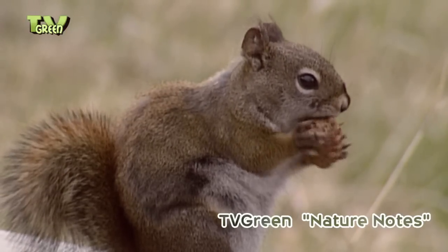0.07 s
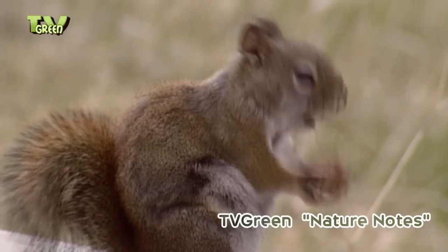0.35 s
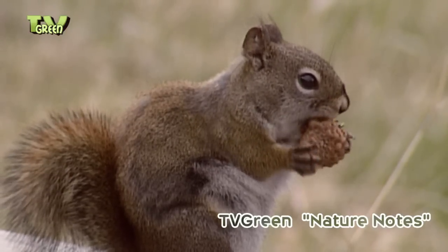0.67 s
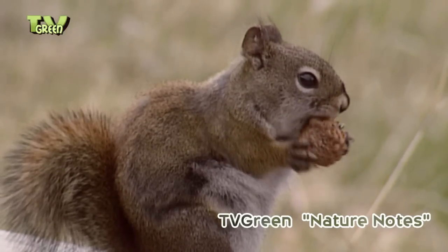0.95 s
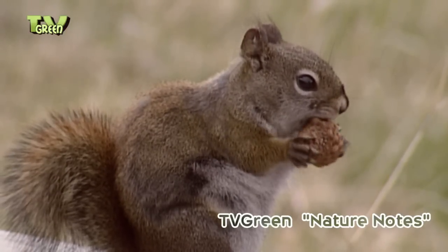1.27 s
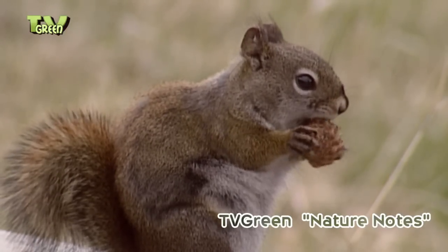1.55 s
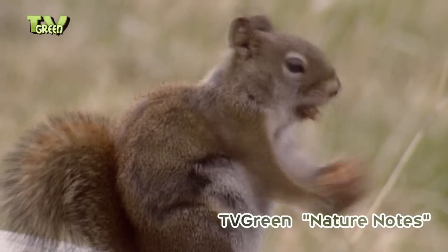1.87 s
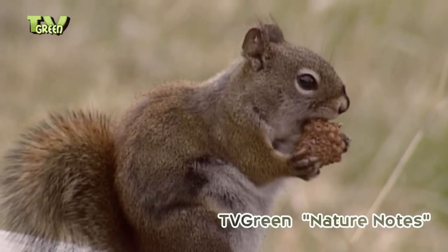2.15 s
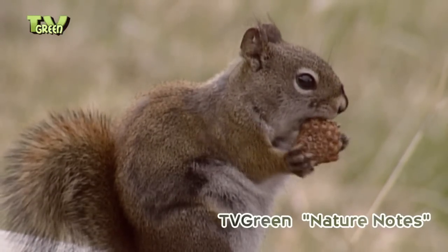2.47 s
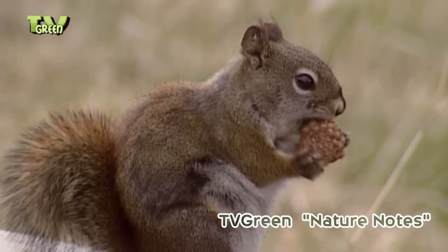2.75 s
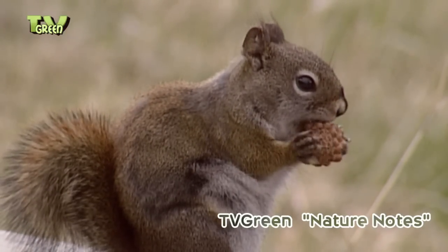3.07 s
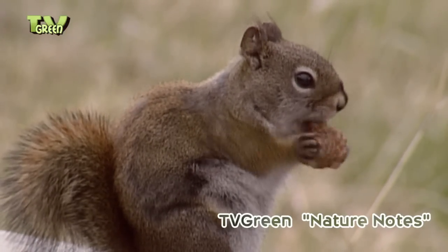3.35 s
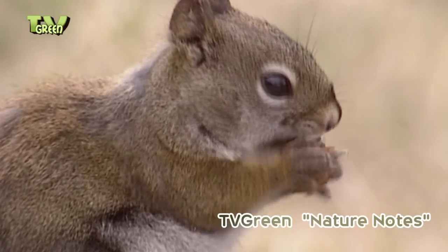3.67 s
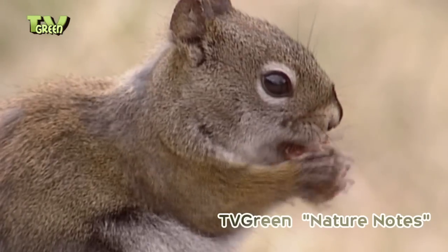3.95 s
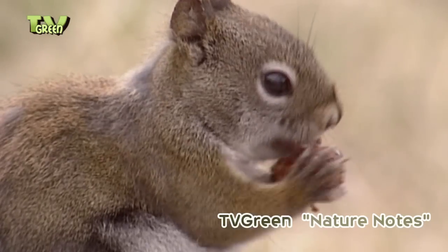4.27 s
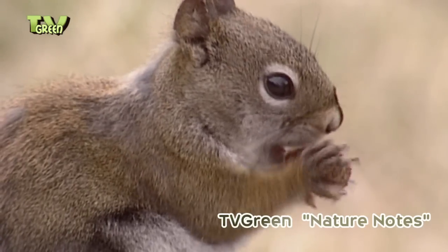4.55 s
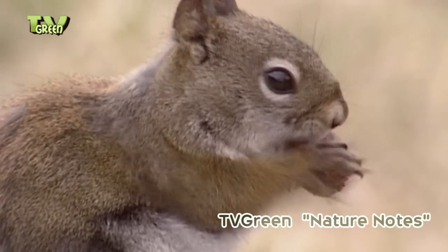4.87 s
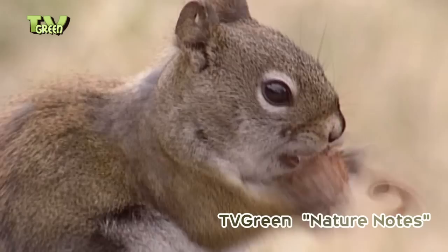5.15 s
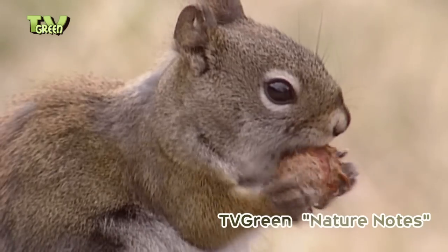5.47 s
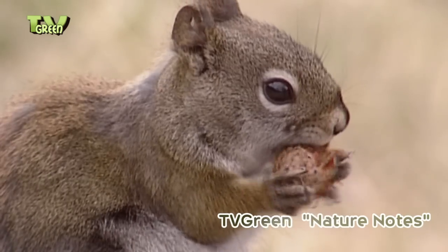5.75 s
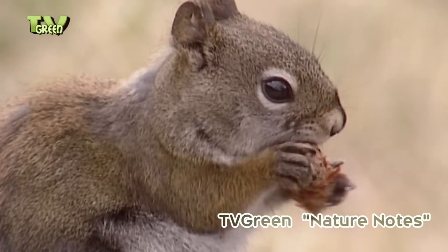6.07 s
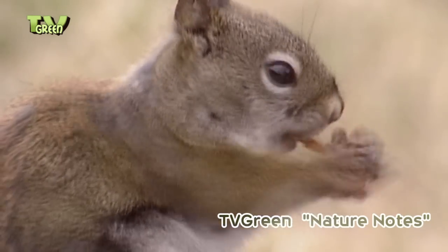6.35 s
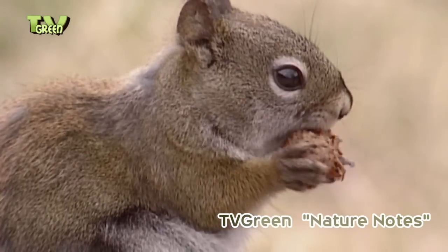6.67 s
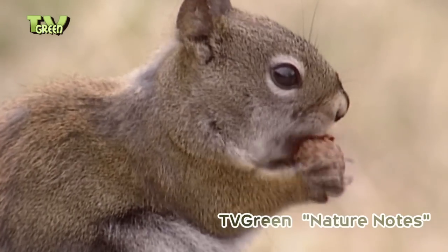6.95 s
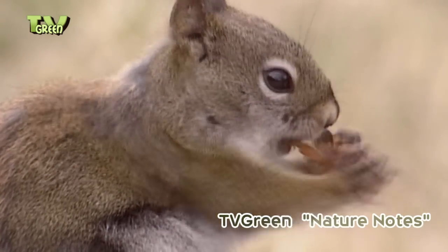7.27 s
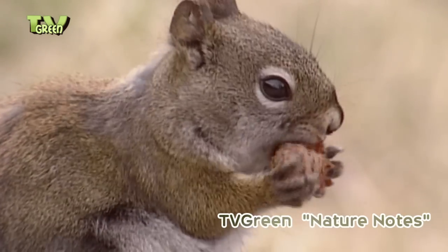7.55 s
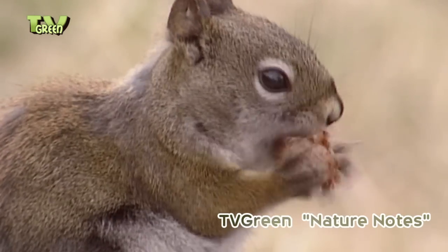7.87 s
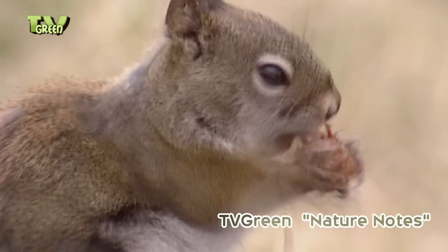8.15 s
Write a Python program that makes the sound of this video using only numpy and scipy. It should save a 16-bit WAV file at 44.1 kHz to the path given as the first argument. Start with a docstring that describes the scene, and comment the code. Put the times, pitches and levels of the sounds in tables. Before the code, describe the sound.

Eight short, squeaky squirrel chirps sound up close, the first two loudest, while birds whistle faintly far off in the woods.

```python
"""Eight sharp chirps from a red squirrel close to the microphone, in a wood. Each is an arched, fluttering
squeak of the vocal folds, closed by a click of the mouth; the trees send back a faint echo.
The squirrel also whimpers once and gnaws and shifts a cone. Far off, birds whistle, twitter, call
and trill. Under it all lie soft hiss, a low drone, rumbling gusts of wind and mains hum."""
import sys
import numpy as np
from scipy import signal
from scipy.fft import rfft, irfft, next_fast_len
from scipy.io import wavfile
from scipy.ndimage import uniform_filter1d, minimum_filter1d, map_coordinates

SR = 44100
rng = np.random.default_rng(int(sys.argv[2]) if len(sys.argv) > 2 else 0)


def transcribe(signal):
    """Save signal, clipped to [-1, 1], as a 16-bit WAV file at the path in sys.argv[1]."""
    frames = np.atleast_2d(signal).T
    limited = np.clip(frames, -1, 1)
    pcm = np.round(limited * 32767).astype(np.int16)
    wavfile.write(sys.argv[1], SR, pcm)


N = 371322

# the squirrel's chirps: start_s, length_s, top_pitch_hz, level_db, roughness, flutter_hz, click_t60_s
CHIRPS = [(0.6259, 0.057, 1895, 3.5, 0.69, 150, .007), (1.4999, 0.053, 1891, 2.5, 0.65, 290, .01),
          (2.345, 0.054, 1700, -8, 0.44, 200, .013), (3.216, 0.05, 1798, -7.5, 0.27, 270, .05),
          (3.907, 0.048, 1697, -10.5, .38, 195, .009), (4.531, .0445, 1719, -9.5, 0.1, 200, .018),
          (5.684, 0.047, 1638, -13, 0.08, 200, .07), (7.3358, 0.047, 1703, -8.5, 0.05, 200, .005)]
# slow drift of the ambience: time_s, hiss_relative_db, chorus_relative_db
AMBIENCE = [(0, -61, -63), (1.8, -63, -65), (2.5, -65.5, -68.5), (3.7, -67, -72.5), (5.8, -67, -71.5),
            (8.42, -65.5, -69.5)]
ONSET_S = .0015  # the vocal folds start up


def squirrel(ceiling=0.89):
    """Close chirps, a soft low blip after each, one rising whimper and the clicks of the mouth."""
    voice = np.zeros(N)
    for start, length, top_hz, db, rough, flutter_hz, _ in CHIRPS:
        call = signal.resample_poly(amp(db) * squeak(length, top_hz, rough, flutter_hz), 2, 1)
        # the hardest calls are overdriven: flattened peaks add harsh overtones
        call = call / (1 + (call / ceiling) ** 6) ** (1 / 6)
        add(voice, start, signal.resample_poly(call, 1, 2))
        blip = slur(0.043, 930, 784, 860, break_db=3.0)
        add(voice, start + .143, amp(-58 + db / 2) * blip * np.tanh(wobble(400, len(blip))))
    whimper = slur(0.038, 2090, 2840, 3100, break_db=-4.5)
    add(voice, 5.735, amp(-47) * whimper)
    # a tiny mouth radiates little bass, and the highest treble is lost
    voice = filtered(voice, lambda hz: hz / np.hypot(hz, 260) / (1 + (hz / 14500) ** 6))
    return voice + amp(4) * mouth_clicks()


def squeak(length, top_hz, rough, flutter_hz, strain_centre=.47, sag=.09, jitter=.05):
    """One arched call: the harmonics of the vocal folds sweep through fixed throat resonances."""
    # throat response: frequency_hz, gain_db
    throat = [(900, -13.5), (1600, -17.5), (1900, -22), (2500, -8.5), (3300, 0.5), (3800, -3), (4400, -4.5),
              (5200, -9), (6100, -4.5), (6900, -0.5), (7500, -4.5), (8400, -24), (10400, -22), (12000, -42),
              (15000, -36.5)]
    # breath noise: frequency_hz, density_db
    rasp = [(100, -22.5), (220, -19.5), (450, -23.5), (900, -15), (1400, -16.5), (2000, -15.5),
            (2500, -21.5), (3400, -1), (5200, -2), (7300, -1.5), (8600, -12.5), (11000, -16.5),
            (16000, -28)]
    size = SR // 8
    t = np.arange(size) / SR
    progress = t / length
    pitch_ratio, effort_db = arch(t, length, rough)
    # under strain a second, slow oscillation chokes the folds and pulls the pitch down
    strain_width = .55 * np.sqrt(rough) * np.where(progress < strain_centre, .5, 1)
    strain = np.exp(-((progress - strain_centre) / strain_width) ** 2)
    flutter_cycles = flutter_hz * (t - strain_centre * length) + 0.039 * wobble(150, size)
    flutter_depth = np.clip(0.94 * rough ** .7 * np.sqrt(strain), 0, .97)
    choke = flutter_depth * np.cos(np.pi * flutter_cycles) ** 4
    effort = amp(effort_db) * (1 - choke) * np.minimum(t / ONSET_S, 1)
    hz = top_hz * pitch_ratio * (1 - sag * choke + jitter * rough * strain * wobble(1500, size))
    phase = 2 * np.pi * np.cumsum(hz) / SR
    k = np.arange(1, 10)[:, None]
    # upper harmonics need more effort than lower ones
    gains = amp(along(throat, k * hz)) * effort ** (0.78 * (k > 3))
    harmonics = np.sum(gains * np.sin(k * phase - np.pi / 6), axis=0)
    # strained folds double their period and hiss
    half_harmonics = np.sum(amp(along(throat, (k - .5) * hz)) * np.cos((k - .5) * phase), axis=0)
    growl = 0.74 * rough ** 1.5 * strain * half_harmonics * wobble(300, size)
    breath = (.55 * rough * strain + .05) * noise(rasp, size)
    return effort * (harmonics + growl + breath) * (progress < 1)


def arch(t, length, rough):
    """Pitch ratio and effort in dB rise, hold, then sink ever faster; strain shortens the attack."""
    attack_s = length * np.clip(.31 - .21 * rough, .05, .5)
    rise_left = np.clip(1 - t / attack_s, 0, 1)
    fall = np.clip((t - attack_s) / (length - attack_s), 0, 1)
    pitch_ratio = 1 - .16 * rise_left ** .75 - 0.37 * fall ** 3
    effort_db = -12 * np.sqrt(rise_left) - 32 * fall ** 4
    return pitch_ratio, effort_db


def mouth_clicks(close_gap_s=.0064):
    """The mouth clicks shut and rings, harder after loud chirps; clean ones also open with a tick."""
    # mouth resonances: centre_hz, width_hz, gain_db
    modes = [(930, 87, -9.5), (1810, 350, -5.5), (2520, 310, -10), (3650, 1100, -1), (5740, 400, 4.5),
             (7340, 1000, -11)]
    clicks = []
    for start, length, _, db, rough, _, t60 in CHIRPS:
        clicks.append((start + ONSET_S / 2, -13 - 54.5 * rough, .004))
        close_db = -15 + 0.32 * db - 10 * np.log10(t60 / .01)  # a longer click spreads the same energy
        clicks.append((start + length + close_gap_s, close_db, t60))

    def cavity(hz):
        return sum((-1) ** k * amp(db) * 1j * hz * width / (centre ** 2 - hz ** 2 + 1j * hz * width)
                   for k, (centre, width, db) in enumerate(modes))
    return filtered(bursts(clicks), cavity)


def cone():
    """Teeth tick on a dry cone, and paws shift it with a soft rustle."""
    # gnawing ticks: start_s, level_db, t60_s
    ticks = [(6.585, -50.5, 0.03), (6.593, -46, 0.015), (8.1545, -33, 0.0086)]
    # paw movements: start_s, length_s, level_db
    rustles = [(1.989, 0.07, -57), (6.54, 0.072, -54)]
    # rustle spectrum: frequency_hz, density_db
    paws = [(60, -8.5), (200, 3.5), (900, -8), (1600, -28), (6000, -40.5)]
    out = filtered(bursts(ticks), lambda hz: 1 / (1 + 1j * hz / 11000))
    for start, length, db in rustles:
        size = round(length * SR)
        add(out, start, amp(db) * np.hanning(size) * noise(paws, SR // 2)[:size])
    return out


def tree_echo(x, delay_s=.1055, trunk_hz=2500):
    """One slightly smeared answer from the trees; thin trunks send back mostly treble."""
    echo = filtered(x, lambda hz: np.exp(-2j * np.pi * hz * delay_s) * hz / np.hypot(hz, trunk_hz))
    return echo + 0.28 * woods(echo, t60=0.024)


def woods(x, t60):
    """Diffuse scatter from ground and trunks."""
    t = np.arange(SR // 2) / SR
    tail = rng.standard_normal(len(t)) * amp(-60 * t / t60) * (1 - np.exp(-t / .008))
    return signal.fftconvolve(x, tail / np.linalg.norm(tail))[:N]


def far_birds():
    """One song, whistles, twitters and nasal calls, far off among the trees."""
    # falling notes: plain whistles, plus the lower tones under the nasal calls near 4.05 s and 6.39 s: start_s,
    # length_s, first_hz, fall_share, level_db
    falling_notes = [(1.819, 0.094, 2490, 0.06, -60), (2.121, .3, 3023, 0.1, -49), (2.463, .09, 1834, 0.12, -55),
                     (4.077, .13, 1950, .18, -60.5), (4.102, .18, 3760, 0.25, -54),
                     (4.347, 0.058, 3006, 0.036, -59.5), (4.569, 0.08, 2400, .05, -48),
                     (4.681, 0.057, 2720, 0.044, -53), (5.26, .11, 2387, 0.063, -56),
                     (6.405, 0.1, 2308, 0.2, -56), (6.679, 0.18, 3940, 0.0095, -62),
                     (6.93, 0.096, 2480, .06, -50.5)]
    # quick twitters: start_s, length_s, first_hz, level_db
    twitters = [(2.679, 0.044, 3214, -59.5), (2.78, 0.093, 4110, -55), (2.875, 0.047, 3000, -59.5),
                (3.032, 0.094, 4266, -57), (4.976, .05, 3200, -61.5), (7.509, 0.039, 4430, -67)]
    # nasal calls: start_s, length_s, top_pitch_hz, level_db, roughness
    nasal_calls = [(0.378, 0.046, 2105, -42, 0.2), (1.143, 0.046, 1876, -54, 0),
                   (4.054, 0.07, 1917, -55, 0.3), (5.158, 0.052, 1880, -59, .1),
                   (6.175, 0.059, 2010, -56, 0.17), (6.394, 0.19, 1430, -56.5, 1.2),
                   (6.729, 0.068, 1955, -51, 0.38), (7.157, 0.061, 2090, -47.5, 0.54)]
    out = songbird()
    for start, length, hz, fall, db in falling_notes:
        add(out, start, amp(db) * whistle(length, hz, fall))
    for start, length, hz, db in twitters:
        add(out, start, amp(db) * twitter(length, hz))
    for when, pitch, steepness in rng.random((5, 3)):  # fainter whistles come by chance
        add(out, 4 + 4 * when, amp(-64) * whistle(0.054, 2000 + 1800 * pitch, 0.28 * steepness))
    for start, length, top_hz, db, rough in nasal_calls:
        call = squeak(length, top_hz, rough, flutter_hz=200)
        overtones = filtered(call, lambda hz: (hz > 2500) / (1 + (hz / 6800) ** 8))
        add(out, start, amp(db) * overtones)
    return out + amp(-9) * woods(out, t60=.14)


def songbird(upsweep_s=.066, trill_start_s=6.704, notes_per_s=27.9, trill_notes=13):
    """Three pairs of a high upsweep and a lower downsweep, then an even trill that fades at its end."""
    # sweep pairs, timed at the turn from up to down: turn_s, level_db
    pairs = [(6.044, -47.5), (6.301, -46), (6.566, -44)]
    out = np.zeros(N)
    for turn, db in pairs:
        add(out, turn - upsweep_s, amp(db) * slur(upsweep_s, 6650, 7000, 7950))
        add(out, turn, amp(db - 2) * slur(0.05, 4600, 4200, 3130))
    for k in range(trill_notes):
        db = -51.5 - 13 * (k / trill_notes) ** 4
        note = slur(.017, 4130, 4370, 4620, warble=0, break_db=.3)
        add(out, trill_start_s + k / notes_per_s, amp(db) * note)
    return out


def whistle(length, hz, fall):
    """A note that slides down and levels out."""
    return slur(length, hz, hz * (1 - 0.84 * fall), hz * (1 - fall))


def twitter(length, hz, octaves_per_s=10.5, chop_hz=40):
    """A steep fall, chopped into pulses."""
    drop = 2 ** (-octaves_per_s * length)
    note = slur(length, hz, hz * np.sqrt(drop), hz * drop, break_db=1.3)
    t = np.arange(len(note)) / SR
    return note * (1 - 0.51 * np.cos(2 * np.pi * chop_hz * t))


def slur(length, first_hz, middle_hz, last_hz, warble=0.0048, break_db=0.5):
    """A pure note gliding through three pitches; fast glides warble and break up."""
    size = SR // 3
    u = np.minimum(np.arange(size) / SR / length, 1)  # progress through the note
    hz = first_hz * (1 - u) * (1 - 2 * u) + middle_hz * 4 * u * (1 - u) + last_hz * u * (2 * u - 1)
    glide_speed = min(abs(np.log(first_hz / last_hz)) / length, 7)
    hz = hz * (1 + warble * glide_speed * wobble(131.4, size))
    waver_db = (break_db * glide_speed - 1) * wobble(78, size)
    swell = np.sqrt(np.abs(np.sin(np.pi * u))) * amp(waver_db)
    return swell * np.sin(2 * np.pi * np.cumsum(hz) / SR)


def soft_hiss(t):
    """Broad hiss, slightly different on the left and right."""
    # hiss spectrum: frequency_hz, density_db
    spectrum = [(200, 7.5), (500, 1.5), (1000, -0.5), (2500, -2.5), (7000, -2.5), (15000, 0.5)]
    level_db, _ = curves(AMBIENCE, t)
    mid = noise(spectrum, N)
    side = amp(-13) * np.array([[1], [-1]]) * noise(spectrum, N)
    return amp(level_db + 7) * (mid + side)


def far_chorus(t, centre_hz=5400, width_hz=420):
    """Distant twittering blurs into a narrow, flickering band of noise."""
    _, level_db = curves(AMBIENCE, t)
    band = filtered(rng.standard_normal(N), lambda hz: np.exp(-((hz - centre_hz) / width_hz) ** 2))
    return amp(level_db - 3) * unit(band * amp(4 * wobble(90, N)))


def wind(t, breeze_db=-68):
    """Rumbling gusts swell and die away over a light breeze."""
    # gusts: peak_s, half_width_s, level_db
    gusts = [(3.06, 0.22, -50), (5.68, 0.2, -49), (6.58, 0.11, -51), (8.24, 0.2, -41.5)]
    # wind spectrum: frequency_hz, density_db
    rumble = [(15, -28), (40, -2), (85, -1), (150, -13.5), (300, -28.5), (700, -48.5), (2000, -76)]
    swells = sum(amp(db) * np.exp(-((t - peak) / width) ** 2) for peak, width, db in gusts)
    return (amp(breeze_db) + swells) * amp(2.5 * wobble(13.0, N)) * noise(rumble, N)


def mains_hum(t):
    """The steady mains tone and its octave."""
    # hum partials: pitch_hz, level_db
    partials = [(60, -53), (120, -77)]
    return sum(amp(db) * np.sqrt(2) * np.sin(2 * np.pi * hz * t) for hz, db in partials)


def low_drone():
    """A steady bed of deep noise."""
    # drone spectrum: frequency_hz, density_db
    spectrum = [(15, -25), (38, 3.5), (70, -6.5), (130, -9.5), (300, -21), (700, -32), (2000, -40.5)]
    return amp(-59) * noise(spectrum, N)


def amp(db):
    """Decibels to gain."""
    return 10 ** (np.asarray(db) / 20)


def unit(x):
    """Scale to rms 1."""
    return x / np.sqrt(np.mean(x ** 2) + 1e-20)


def along(points, hz):
    """Read (frequency_hz, value) points on a log frequency axis."""
    knots_hz, values = np.transpose(points)
    return np.interp(np.log(hz + 1), np.log(knots_hz + 1), values)


def curves(rows, t):
    """Every column after the first, read at times t."""
    times, *columns = np.transpose(rows)
    return [np.interp(t, times, column) for column in columns]


def wobble(rate, size):
    """A random curve, rate knots a second."""
    return map_coordinates(rng.standard_normal(size + 4), [np.arange(size) * rate / SR], order=1)


def filtered(x, response):
    """Pass x through a frequency response."""
    size = x.shape[-1]
    padded = next_fast_len(size + 8192)
    return irfft(rfft(x, padded) * response(np.fft.rfftfreq(padded, 1 / SR)), padded)[..., :size]


def noise(spectrum, size):
    """Coloured noise of rms 1."""
    return unit(filtered(rng.standard_normal(size), lambda hz: amp(along(spectrum, hz))))


def bursts(rows):
    """Short decaying puffs of white noise."""
    out = np.zeros(N)
    t = np.arange(SR // 20) / SR
    for start, db, t60 in rows:
        add(out, start, amp(db - 60 * t / t60) * rng.standard_normal(len(t)))
    return out


def add(track, start_s, sound):
    """Mix a sound into the track."""
    part = track[round(start_s * SR):][:len(sound)]
    part += sound[:len(part)]


def scene():
    """The squirrel at the microphone, trees around it, birds and air behind."""
    t = np.arange(N) / SR
    near = squirrel()
    reflections = amp(-37) * tree_echo(near) + amp(-47) * woods(near, t60=.25)
    animals = near + reflections + cone() + far_birds()
    return animals + soft_hiss(t) + far_chorus(t) + wind(t) + mains_hum(t) + low_drone()


def record(dry, ceiling=0.97, edge_hz=15550, top_hz=15950):
    """A stereo pair, unequal in colour and phase, into a fast peak limiter and a steep treble cut."""
    # channel balance: frequency_hz, left_minus_right_db
    tilt = [(60, 5.4), (500, 4.8), (3000, 3.3), (6000, 1.7), (8500, .1), (13000, -3)]
    # phase between the channels: frequency_hz, left_lead_rad
    lead = [(200, .03), (600, .12), (5500, .12), (7200, .33), (9000, .45), (13000, .4)]
    half = np.array([[.5], [-.5]])
    pair = filtered(dry, lambda hz: amp(half * along(tilt, hz)) * np.exp(1j * half * along(lead, hz)))
    needed_gain = np.minimum(1, ceiling / (np.abs(pair).max(axis=0) + 1e-9))
    gain = uniform_filter1d(minimum_filter1d(needed_gain, size=15), size=15)
    return filtered(pair * gain, lambda hz: np.clip((top_hz - hz) / (top_hz - edge_hz), 0, 1))


dry = scene()
out = record(dry)
transcribe(out)
```